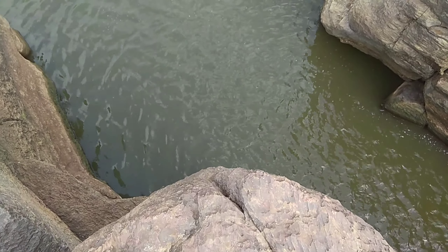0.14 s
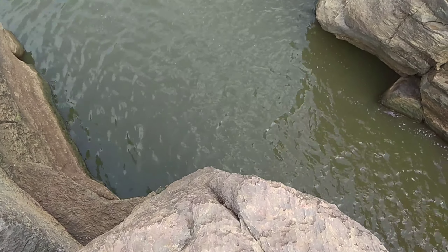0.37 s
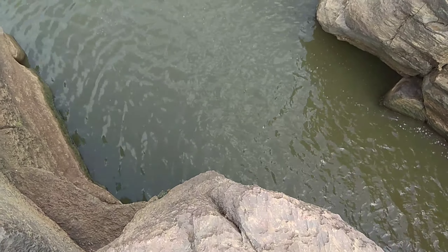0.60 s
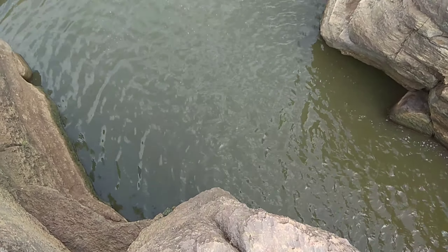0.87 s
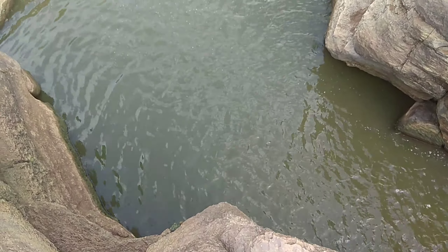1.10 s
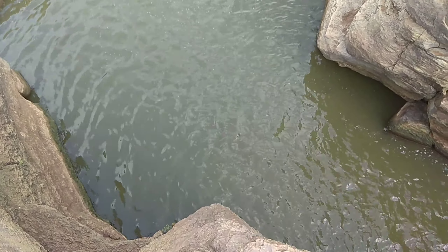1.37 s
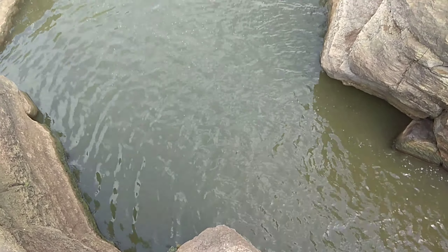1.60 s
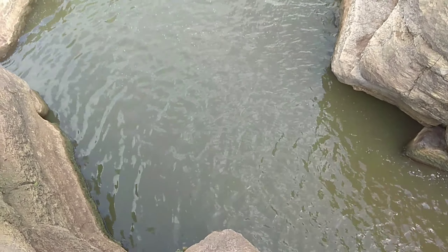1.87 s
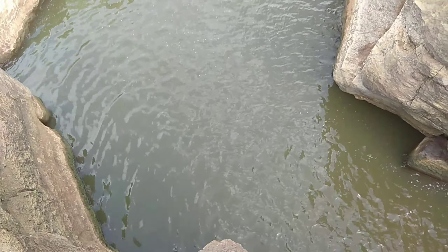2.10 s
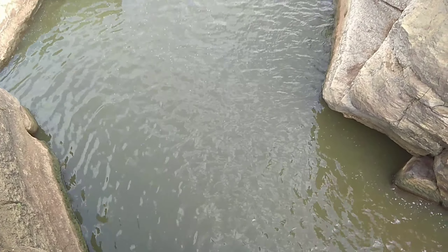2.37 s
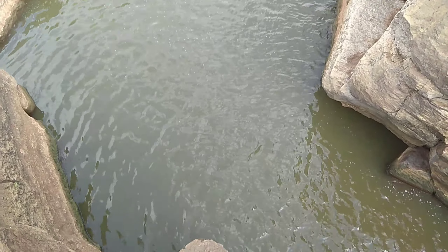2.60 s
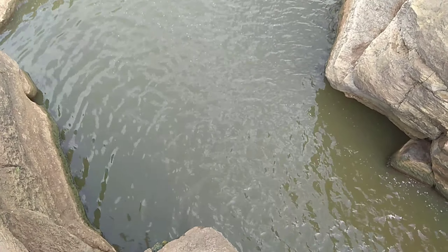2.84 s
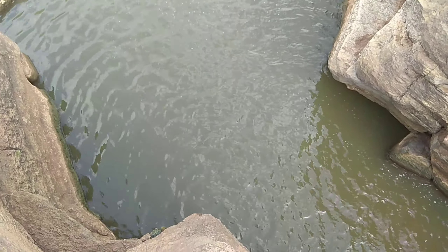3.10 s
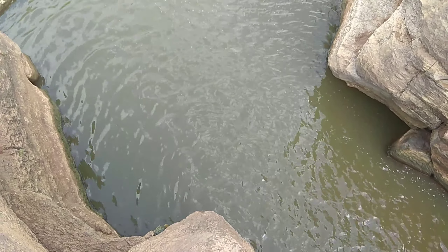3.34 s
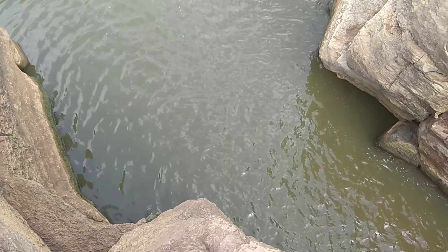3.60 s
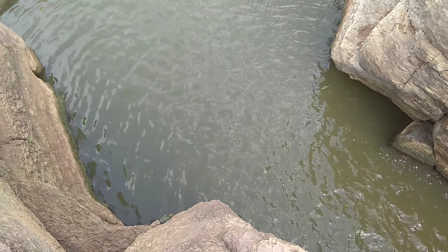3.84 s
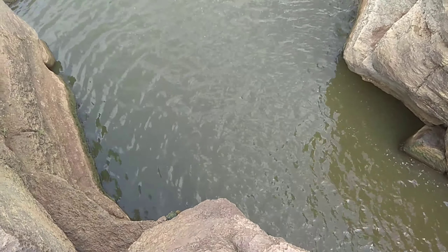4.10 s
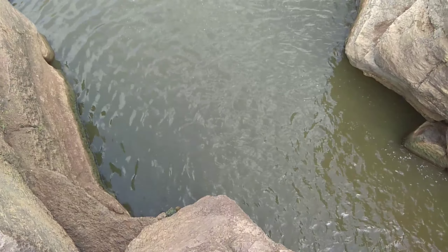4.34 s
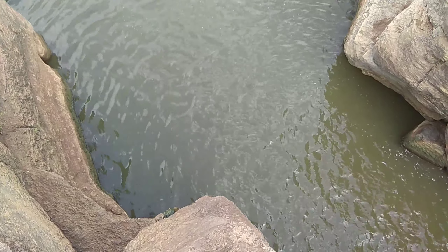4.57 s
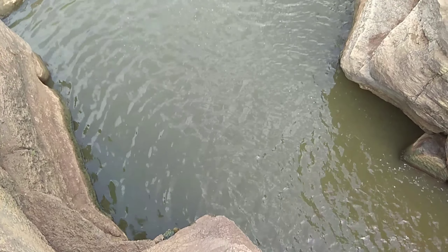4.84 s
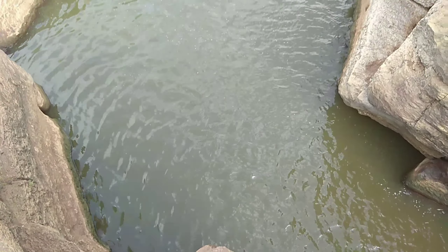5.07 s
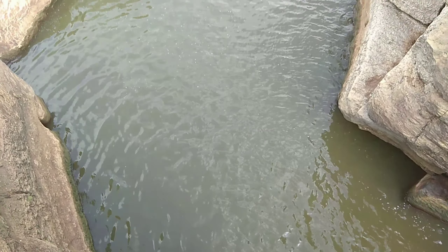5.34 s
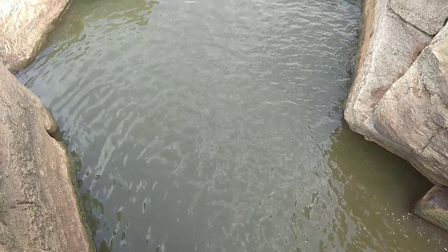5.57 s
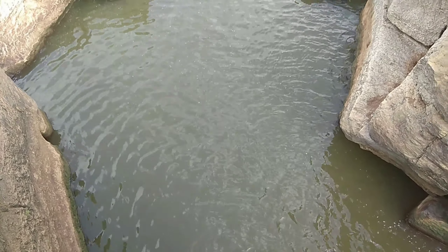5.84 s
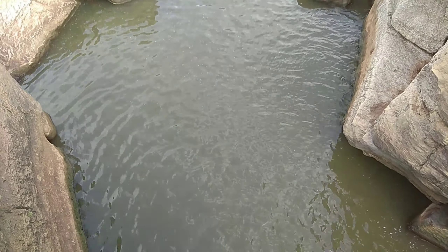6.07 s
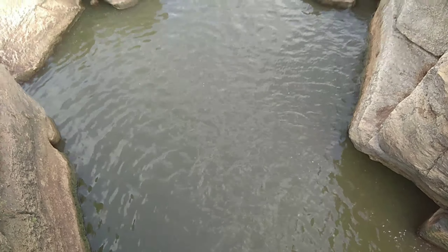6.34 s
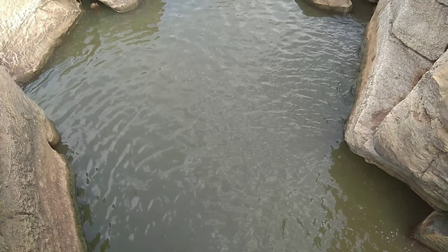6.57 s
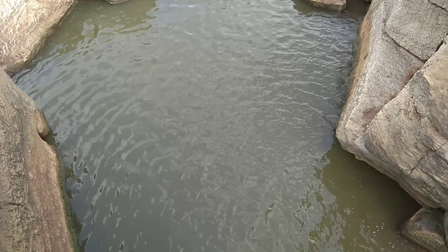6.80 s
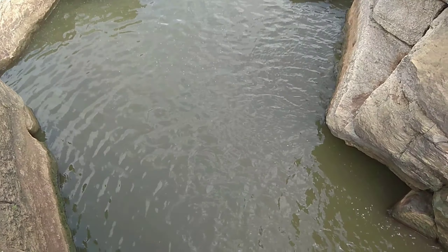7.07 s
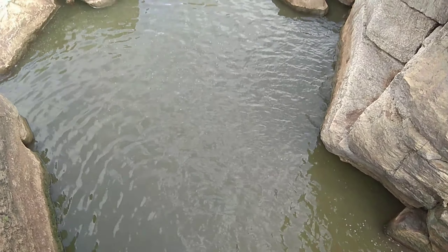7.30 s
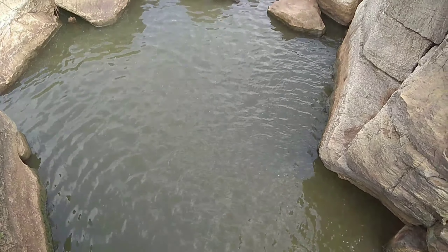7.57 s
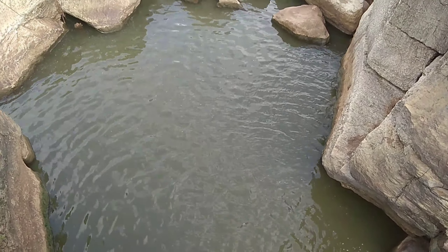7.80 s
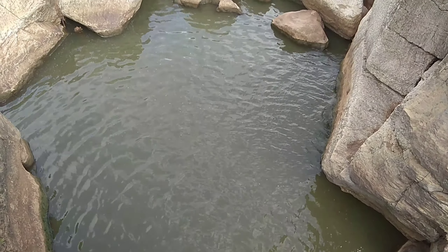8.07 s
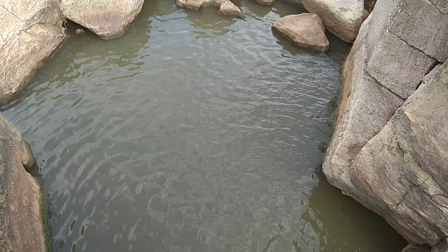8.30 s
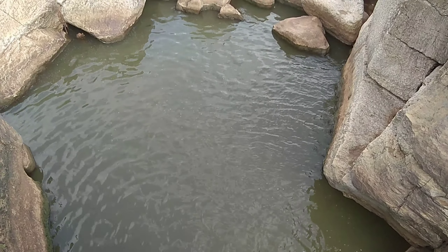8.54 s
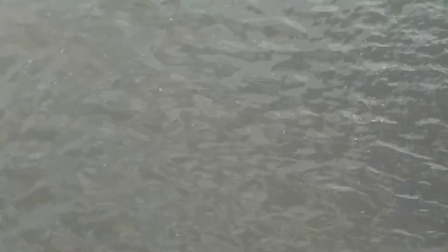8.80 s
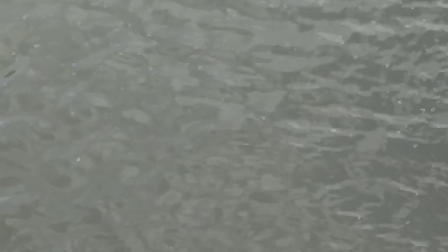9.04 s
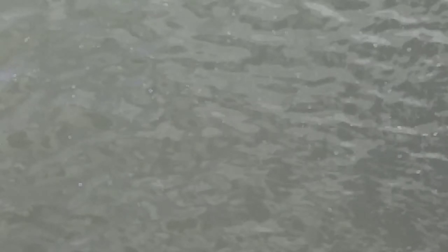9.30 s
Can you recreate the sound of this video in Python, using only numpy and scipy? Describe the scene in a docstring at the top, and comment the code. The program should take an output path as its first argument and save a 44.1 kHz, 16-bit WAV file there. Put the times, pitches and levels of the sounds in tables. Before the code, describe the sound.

From 0 to about 9.4 seconds a small waterfall rushes without pause into a rocky pool outdoors. It begins slightly quieter and duller and swells over the first 2 to 3 seconds to a steady level. A low, soft plunging roar lies beneath dense splashing made of countless tiny bursting bubbles, with fizzing spray, mist and very fine hiss above. Small irregular surges make the splash and spray tremble quickly. Around 4.6 to 5.1 seconds a short low puff of wind flutters, mostly at left; from about 5.1 to 5.8 the finest hiss brightens. Near 7.3 the high mist dips a little, then at 7.6 the tone shifts slightly and continues evenly to an abrupt end. The hand-held stereo microphone hears brighter treble at left, a shaded right side with tiny gaps, and thin flickering, grainy high pitches.

```python
"""The rush of a small waterfall swells at the start, off to the left of a hand-held camera that slowly tilts up.
Its plunge into a rock pool roars, bubbles burst as rising chirps, and spray, mist and hiss are shaped noise.
The lower sounds reach the left port first; the camera body shades the right port, most of all in the treble.
Single thin pitches are heard to flicker, and one puff of wind flutters, mostly at the left port."""
import sys
import numpy as np
from scipy import signal
from scipy.fft import rfft, irfft, next_fast_len
from scipy.io import wavfile
from scipy.ndimage import uniform_filter1d, map_coordinates

SR = 44100
rng = np.random.default_rng(int(sys.argv[2]) if len(sys.argv) > 2 else 0)


def boost_factor(decibels):
    """Convert a level in decibels to a linear amplitude factor."""
    exponent = np.asarray(decibels, float) / 20
    return 10 ** exponent


def int16_out(signal):
    """Quantize to a 16-bit WAV file."""
    q = np.round(np.clip(np.atleast_2d(signal).T, -1, 1) * 32767)
    wavfile.write(sys.argv[1], SR, q.astype(np.int16))


N = 415422  # length of the scene [samples]


def unit(x):
    """Scales x to an rms of 1."""
    return x / np.sqrt(np.mean(x ** 2) + 1e-20)


def along(points, hz):
    """Reads a (frequency, value) table at any pitch, in straight lines on a log pitch axis."""
    f, value = np.transpose(points)
    return np.interp(np.log(hz + 1), np.log(f + 1), value)


def wobble(rate):
    """A smooth random curve through rate random points a second."""
    points = rng.standard_normal(N // 1000)
    return map_coordinates(points, [np.arange(N) * rate / SR])


def filtered(x, response):
    """Multiplies the spectrum of x by a response that depends on frequency."""
    m = next_fast_len(N + 8192)
    spectrum = rfft(x, m) * response(np.fft.rfftfreq(m, 1 / SR))
    return irfft(spectrum, m)[..., :N]


# When the camera turns a little: (middle [s], length [s])
CAMERA_TURN = (7.6, .25)


def settle(level):
    """Level in dB: rises to its settled value, then steps when the camera turns."""
    db, start_db, rise_s, turn_db = level
    middle, length = CAMERA_TURN
    t = np.arange(N) / SR
    turned = np.clip((t - middle) / length + .5, 0, 1)
    return db - start_db * np.exp(-t / rise_s) + turn_db * turned


def bump(middle, half_width, db):
    """A brief, flat-topped change of level in dB."""
    return db * np.exp(-((np.arange(N) / SR - middle) / half_width) ** 4)


def bubbles(count, hz, spread, cycles, size_db):
    """Damped chirps at random moments; a bubble's pitch rises as it nears the surface."""
    when, pitch = rng.random(count), rng.standard_normal(count)
    size = rng.exponential(size=count)
    t = np.arange(200)
    start_hz = np.clip(hz * np.exp(spread * pitch), 300, 15000)
    turns = np.outer(start_hz / SR, t)
    chirp = np.sin(2 * np.pi * turns * (1 + 0.065 * turns / cycles))
    ring = chirp * np.exp(-3 * turns / cycles) * boost_factor(size_db * size)[:, None]
    at = (when * N).astype(int)[:, None] + t
    return unit(np.bincount(at.ravel(), ring.ravel(), N + len(t))[:N])


# The shadow of the camera body: (frequency [Hz], left over right [dB])
BODY_SHADOW = [(100, -1), (1000, -2), (2000, -2), (2600, -3), (5000, 0), (8000, 1), (10000, 6),
               (11000, 11.5), (12500, 14), (14000, 7.5), (15500, 3.5)]
# The path round the body, before the aim stretches it: (frequency [Hz], right port trails by [cycles])
RIGHT_TRAILS = [(0, 0), (690, .25), (1350, .5), (2050, .75), (3070, 1.25), (3620, 1.5), (3950, 1.75),
                (4830, 2.25), (5800, 2.75), (7700, 3.5), (9500, 4.5), (16000, 8)]
# How alike the ports sound, before the aim changes the treble: (frequency [Hz], likeness [0-1])
LIKENESS = [(40, 0.87), (300, 1), (800, 0.81), (1600, 0.85), (2600, 0.79), (3600, 0.69), (4500, 0.5),
            (6000, 0), (7800, 0.48), (10000, 0.3), (15000, .03)]
# How far the left port leads; higher up there is hardly a lead, and what the ports share is
# only in phase or in opposite phase: (frequency [Hz], share [0-1])
LEFT_LEADS = [(1900, 0.92), (2400, 0), (5500, 0.01), (8000, 0.14)]
# The drifting aim of the camera:
# (time [s], change of likeness in the treble [factor], stretch of the path between the ports [factor])
CAMERA_AIM = [(0, .5, .82), (1, .68, .9), (2.3, 1.08, .98), (3.2, 1.05, .9), (5.2, 1.3, .99),
              (6.3, 1.25, .97), (7.4, .92, .94), (7.7, .68, 1.04), (8.5, .84, 1.07), (9.42, .65, 1.05)]


def at_ports(spectrum, patchy_db, grains=0):
    """One sound and its scattered echoes at two ports: patchy in time and pitch, shaded and late on the right."""
    hz, t, noise = signal.stft(rng.standard_normal((2, N)) + grains, SR, nperseg=1024)
    patches = uniform_filter1d(rng.standard_normal(noise.shape[1:]), size=12, axis=0)
    patches = unit(uniform_filter1d(patches, size=7, axis=1))
    one, other = noise * boost_factor(patchy_db * patches)

    time, direct, stretch = np.transpose(CAMERA_AIM)
    t = np.minimum(t, (N - 1) / SR)
    direct, stretch = np.interp(t, time, direct), np.interp(t, time, stretch)
    lead = np.clip(along(LEFT_LEADS, hz), 0, 1)[:, None]
    trail = np.interp(hz, *np.transpose(RIGHT_TRAILS))[:, None]
    lag = 2 * np.pi * trail * (1 + lead * (stretch - 1))
    alike = np.clip(along(LIKENESS, hz)[:, None] * (lead + (1 - lead) * direct), 0, 1)

    # without a lead only the cosine is left
    shared = alike * (np.cos(lag) - 1j * lead * np.sin(lag))
    right = shared * one + np.sqrt(1 - abs(shared) ** 2 + 1e-9) * other
    pair = signal.istft([one, right], nperseg=1024)[1][:, :N]

    def colour(hz):
        shade = along(BODY_SHADOW, hz) * [[.5], [-.5]]  # half up on the left, half down on the right
        return boost_factor(along(spectrum, hz) + shade)

    return unit(filtered(pair, colour))


# The puff of wind: (start [s], attack [s], hold [s], release [s], left level at the peak [dB])
WIND_PUFF = (4.55, .25, .2, .12, -29)
# Colour of the wind: (frequency [Hz], relative level per Hz [dB])
WIND_COLOUR = [(30, -25), (90, -15), (130, 1), (220, -6), (400, -20), (800, -120)]


def wind():
    """Low noise rises and dies away in one short puff, 15 dB weaker at the right port."""
    start, attack, hold, release, db = WIND_PUFF
    shape = np.interp(np.arange(N) / SR, np.cumsum([start, attack, hold, release]), [0, 1, 1, 0])
    flutter = unit(filtered(rng.standard_normal(N), lambda hz: boost_factor(along(WIND_COLOUR, hz))))
    return boost_factor(db) * shape * flutter * boost_factor([[0], [-15]])


# Colour of the finest hiss, before shading: (frequency [Hz], relative level per Hz [dB])
HISS_COLOUR = [(10000, -120), (12000, -12), (13500, -2), (14500, 3), (15500, 3), (20000, -5)]
# Left level: (settled [dB], lower at the start by [dB], time to settle [s], step at the turn [dB])
HISS_LEFT = (-21.2, 6.4, 1.6, 1.3)
# The hiss swells while the camera tilts up: (middle [s], half width [s], change [dB])
TILT_SWELL = (5.45, .3, 4.8)


def hiss(slugs):
    """The finest hiss, very high noise; on the shaded right port its level only follows the slugs."""
    left_db = settle(HISS_LEFT) + bump(*TILT_SWELL) + 0.8 * slugs
    right_db = -25.5 + .7 * slugs
    return boost_factor([left_db, right_db]) * at_ports(HISS_COLOUR, patchy_db=.8)


# Colour of the mist, before shading: (frequency [Hz], relative level per Hz [dB])
MIST_COLOUR = [(6000, -120), (8000, -10), (9500, 0.5), (11000, -1), (12500, -4.5), (13500, -6),
               (15500, -23), (20000, -120)]
# Level: (settled [dB], lower at the start by [dB], time to settle [s], step at the turn [dB])
MIST_SETTLING = (-18.5, 2.1, 1.1, .1)
# The mist dips just before the turn: (middle [s], half width [s], change [dB])
DIP_BEFORE_TURN = (7.35, .3, -2.6)
# The mist sits a little lower for a while: (middle [s], half width [s], change [dB])
LONG_SAG = (5.9, 1.1, -.9)


def mist(slugs, fizz):
    """High noise, with tiny bubbles mixed in, that follows the slugs of water."""
    db = settle(MIST_SETTLING) + bump(*DIP_BEFORE_TURN) + bump(*LONG_SAG) + 0.8 * slugs
    return boost_factor(db) * at_ports(MIST_COLOUR, patchy_db=0.32, grains=0.28 * fizz)


# Colour of the spray, before shading: (frequency [Hz], relative level per Hz [dB])
SPRAY_COLOUR = [(3000, -120), (4200, -8.5), (5300, -3), (6500, -2), (8000, -1), (9500, -4.5), (11000, -27),
                (13000, -120)]
# Level: (settled [dB], lower at the start by [dB], time to settle [s], step at the turn [dB])
SPRAY_SETTLING = (-20.9, 2.4, 1.0, -2.6)


def spray(slugs, fizz):
    """Hissing noise, with tiny bubbles mixed in, thrown up by the slugs of water."""
    db = settle(SPRAY_SETTLING) + 0.9 * slugs
    return boost_factor(db) * at_ports(SPRAY_COLOUR, patchy_db=0.27, grains=0.44 * fizz)


# Colour of the splash, before shading: (frequency [Hz], relative level per Hz [dB])
SPLASH_COLOUR = [(400, -120), (800, -10.5), (1600, -5.5), (2200, -4), (3000, 0.5), (4500, -0.5), (6000, -7),
                 (8000, -1), (11000, -120)]
# Level: (settled [dB], lower at the start by [dB], time to settle [s], step at the turn [dB])
SPLASH_SETTLING = (-22.3, 3.2, 1.2, .9)


def splash(slugs):
    """Countless bubbles burst in the splash: chirps mixed into noise."""
    pops = np.array([bubbles(count=16000, hz=2985, spread=0.487, cycles=10, size_db=1.5) for _ in range(2)])
    db = settle(SPLASH_SETTLING) + 0.9 * slugs
    return boost_factor(db) * at_ports(SPLASH_COLOUR, patchy_db=0.45, grains=0.32 * pops)


# Colour of the plunge, before shading: (frequency [Hz], relative level per Hz [dB])
ROAR_COLOUR = [(25, -31), (90, -20), (125, -4.5), (200, -0.5), (400, -1), (800, -4), (1500, -8.5),
               (2500, -12), (4000, -49), (6000, -120)]
# Level: (settled [dB], lower at the start by [dB], time to settle [s], step at the turn [dB])
ROAR_SETTLING = (-26, 2, .25, .3)


def roar():
    """The plunge into the pool: low noise that does not follow the slugs."""
    return boost_factor(settle(ROAR_SETTLING)) * at_ports(ROAR_COLOUR, patchy_db=0.69)


def waterfall():
    """The stream breaks up unevenly: each slug splashes and throws spray together."""
    slugs = .5 * wobble(7.3) + 0.28 * wobble(16)
    fizz = np.array([bubbles(count=20000, hz=8850, spread=0.4, cycles=3.9, size_db=1.0) for _ in range(2)])
    return hiss(slugs) + mist(slugs, fizz) + spray(slugs, fizz) + splash(slugs) + roar()


def random_gains(depth, hz, shape, size):
    """Random gains, smoothed over size pitches; dips go deeper than peaks rise."""
    chance = uniform_filter1d(rng.standard_normal(shape), size=3, axis=-1)
    chance = unit(uniform_filter1d(chance, size=size, axis=-2))
    skewed = chance - 0.32 * np.minimum(chance, 0) ** 2
    return boost_factor(along(depth, hz)[:, None] * skewed)


def pitch_power(z):
    """Average power over the whole scene, smoothed over nine neighbouring pitches."""
    power = np.mean(abs(z) ** 2, axis=-1)
    return uniform_filter1d(power, size=9, axis=-1)[..., None] + 1e-20


# How strongly single pitches flicker: (frequency [Hz], depth before dips are deepened [dB])
PITCH_FLICKER = [(700, 0), (1500, 2), (3000, 3), (6000, 3.5), (9000, 3.5), (12000, 1.5), (15000, 1.5)]
# Short gaps heard in the right treble: (frequency [Hz], depth before dips are deepened [dB])
RIGHT_GAPS = [(9500, 0), (11000, 6), (13000, 7), (15500, 4)]


def flicker(pair):
    """Single thin pitches are heard to flicker, and short gaps are heard in the right treble."""
    hz, _, (left, right) = signal.stft(pair, SR, nperseg=1024)
    both = np.array([left + right, left - right]) / 2
    gains = random_gains(PITCH_FLICKER, hz, both.shape, size=2)
    # low down centre and sides flicker each its own way, the treble flickers as one
    own = along([(9000, 1), (10500, 0)], hz)[:, None]
    centre = both[0] * gains[0]
    sides = both[1] * (own * gains[1] + (1 - own) * gains[0])
    gaps = random_gains(RIGHT_GAPS, hz, left.shape, size=4)
    rough = np.array([centre + sides, (centre - sides) * gaps])
    # the overall colour stays as it was
    rough = rough * np.sqrt(pitch_power(np.array([left, right])) / pitch_power(rough))
    return signal.istft(rough, nperseg=1024)[1][:, :N]


def scene():
    """Wind and water at the two ports."""
    return wind() + flicker(waterfall())


def band_limit(x):
    """A steep low-pass at the top of the band."""
    return signal.sosfilt(signal.butter(12, 16820, fs=SR, output="sos"), x)


def record(dry):
    """The camera rounds off the highest peaks and keeps nothing above its band limit."""
    top_hz = 15500
    rounded = dry / (1 + abs(dry / .88) ** 6) ** (1 / 6)
    mix = filtered(rounded, lambda hz: hz < top_hz)
    return band_limit(mix)


dry = scene()
out = record(dry)
int16_out(out)
```